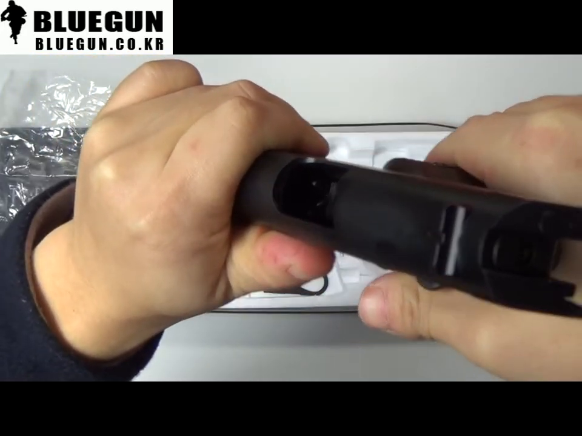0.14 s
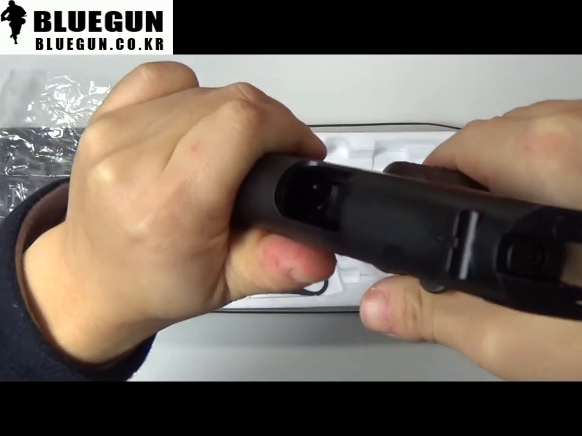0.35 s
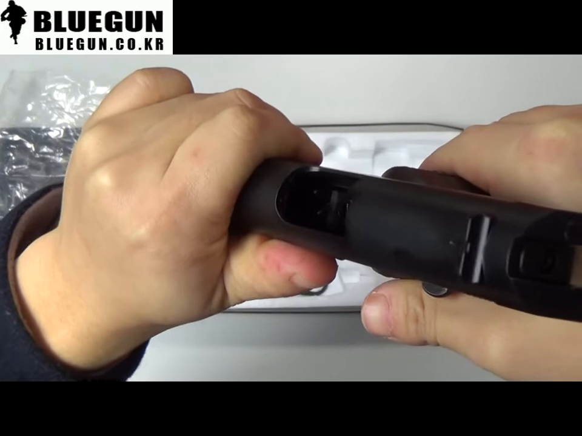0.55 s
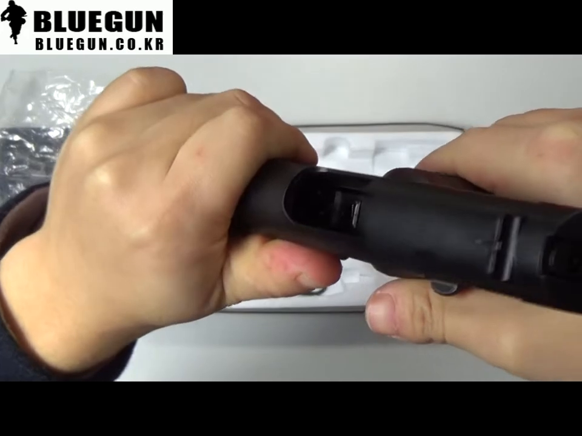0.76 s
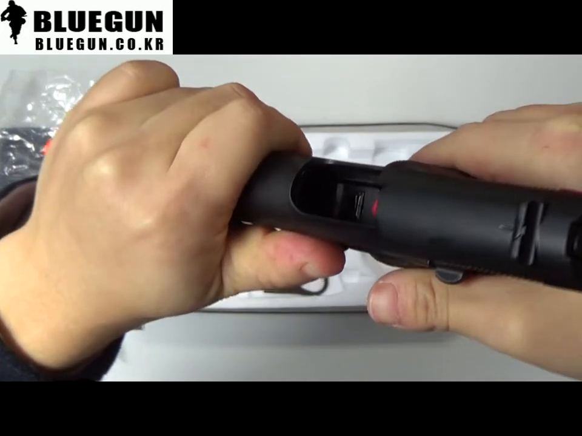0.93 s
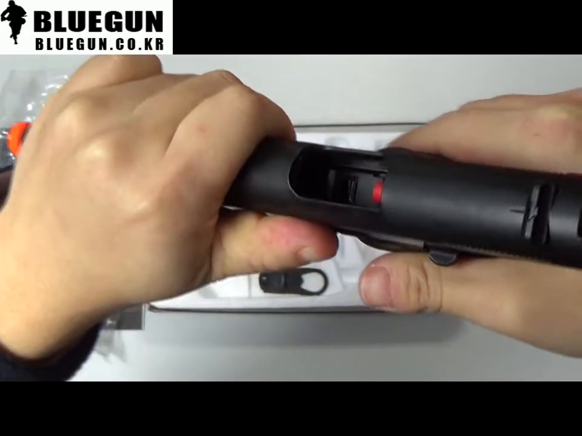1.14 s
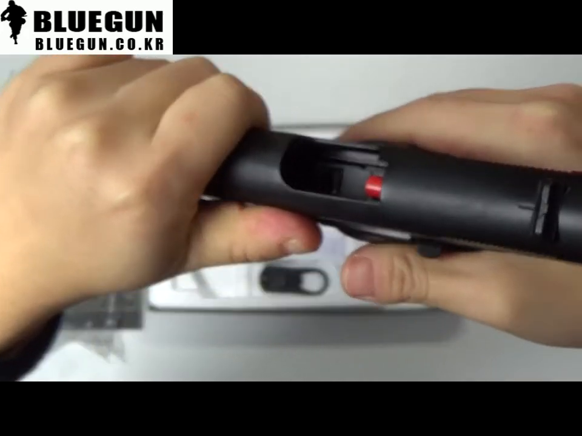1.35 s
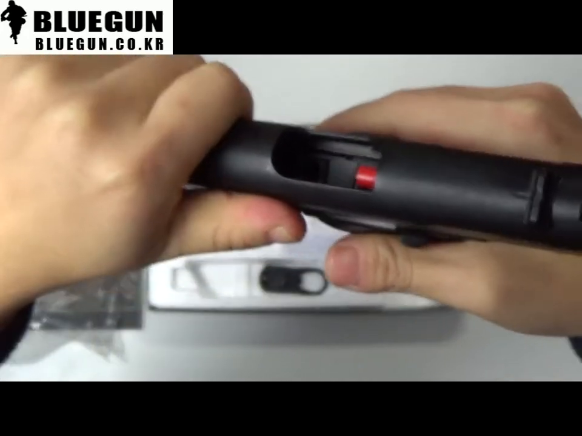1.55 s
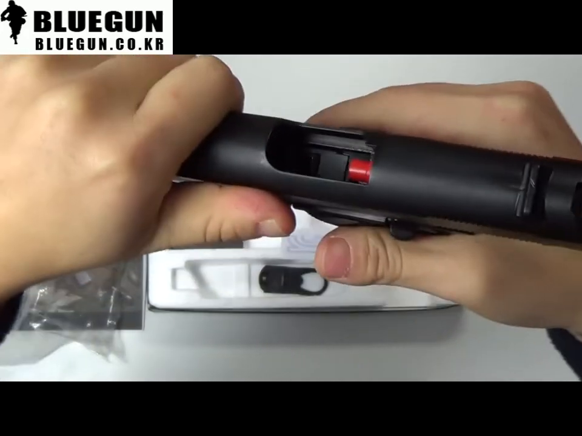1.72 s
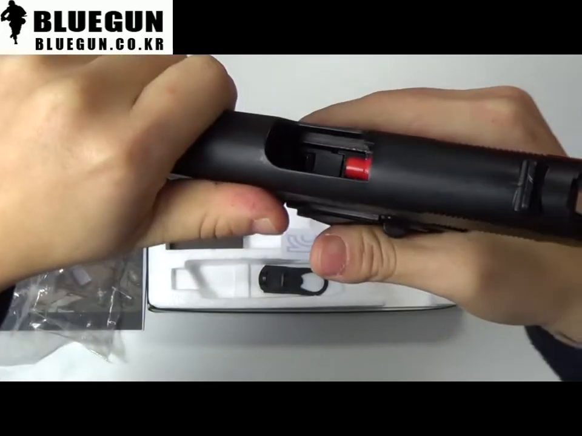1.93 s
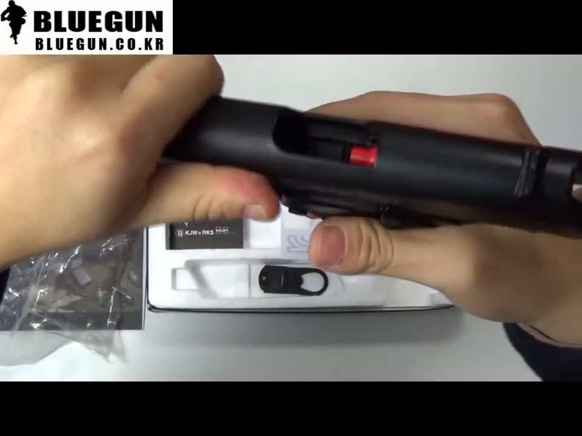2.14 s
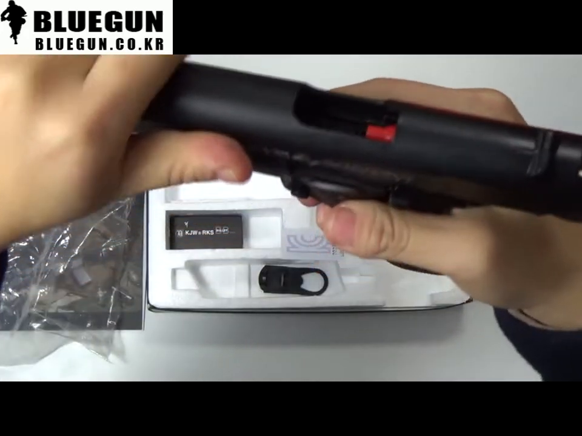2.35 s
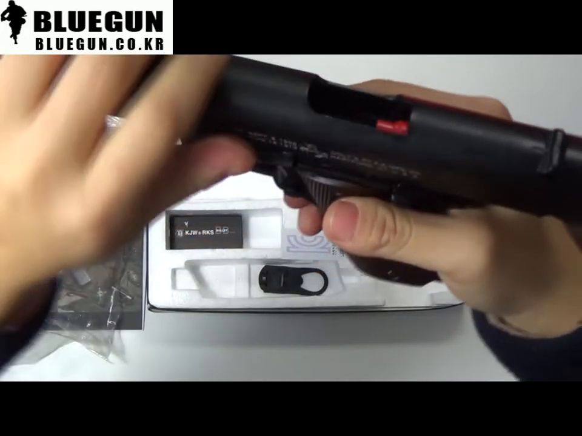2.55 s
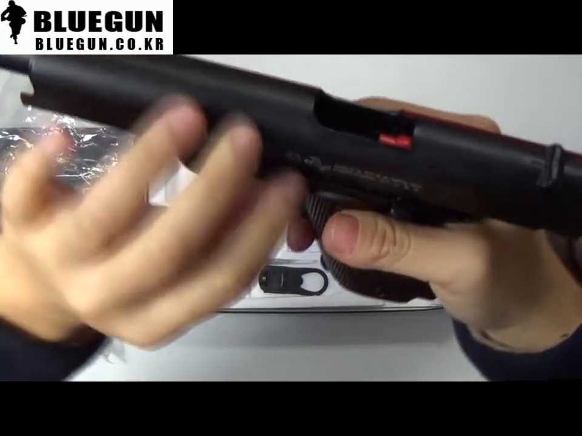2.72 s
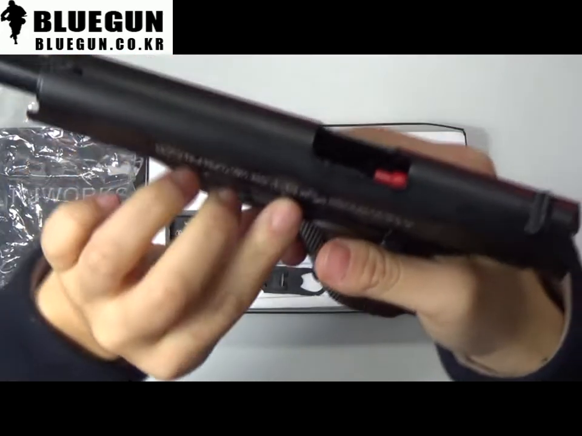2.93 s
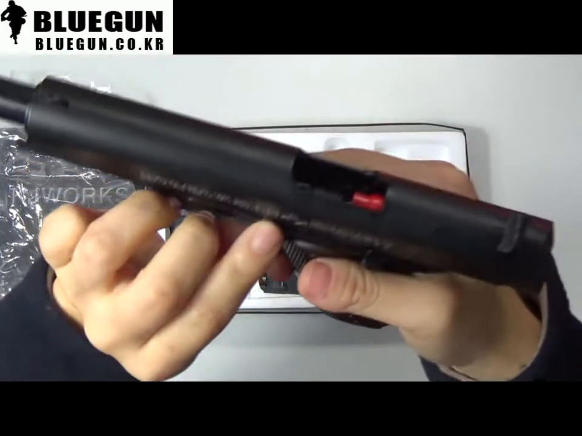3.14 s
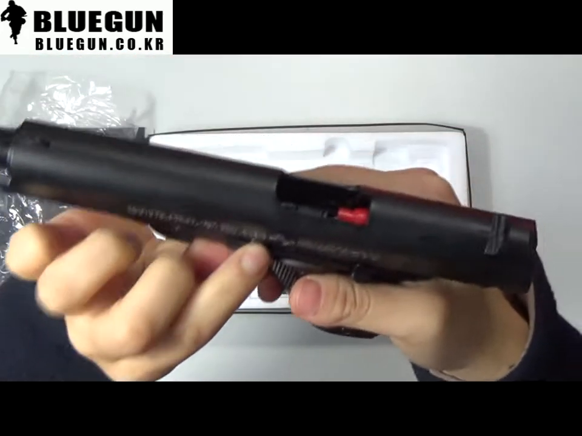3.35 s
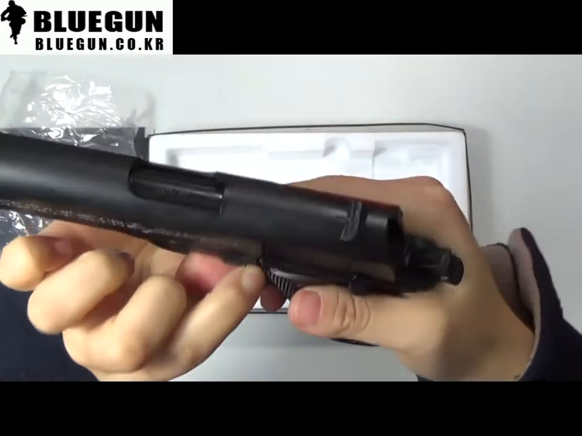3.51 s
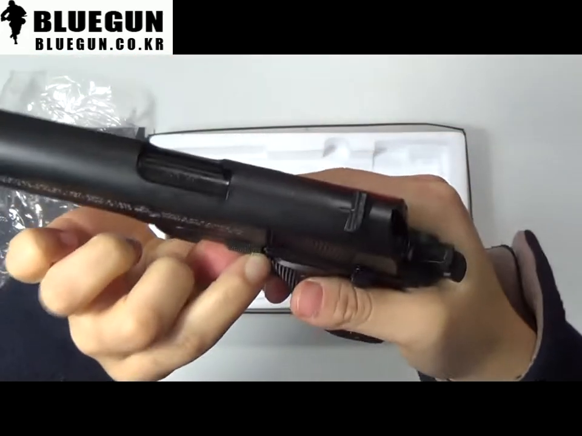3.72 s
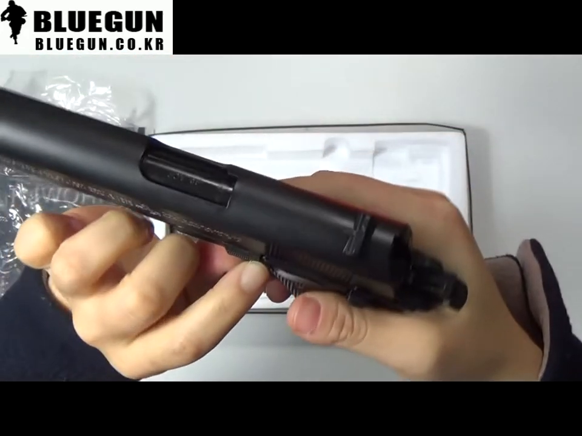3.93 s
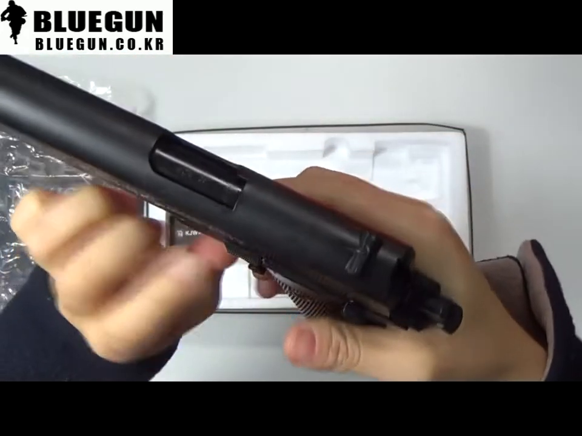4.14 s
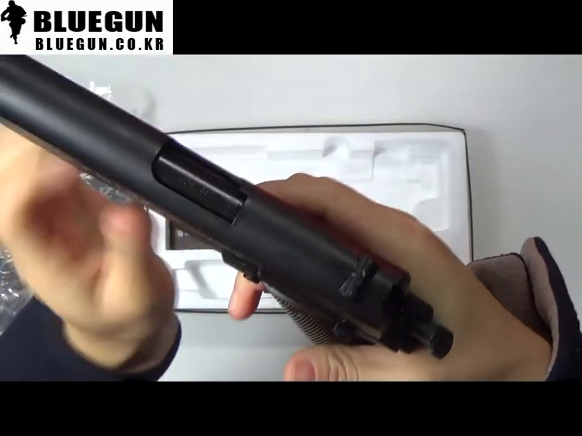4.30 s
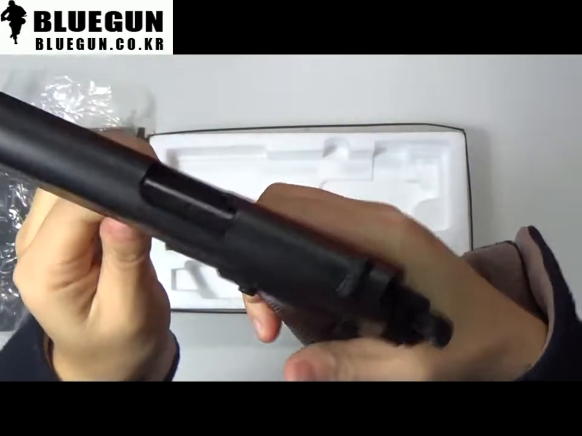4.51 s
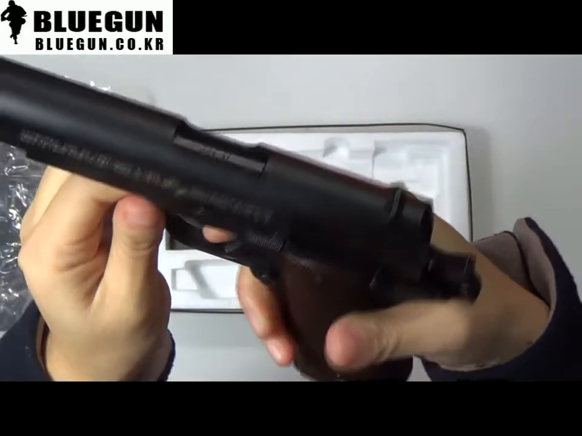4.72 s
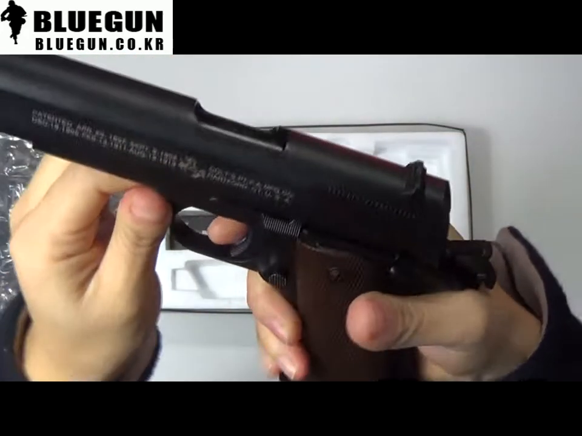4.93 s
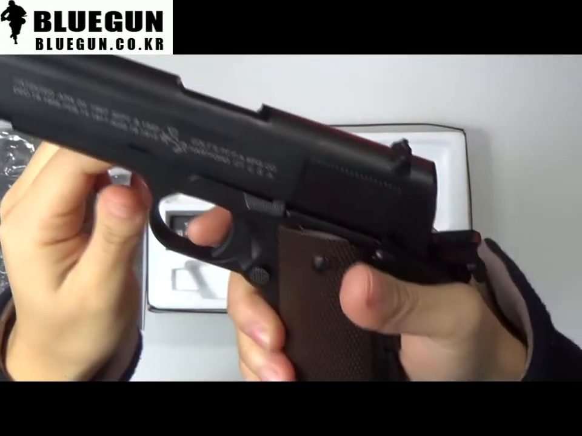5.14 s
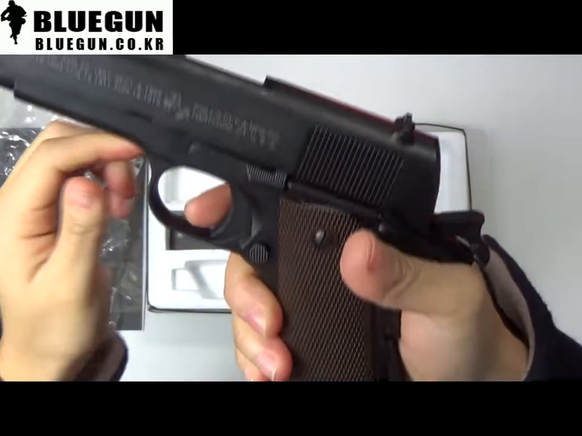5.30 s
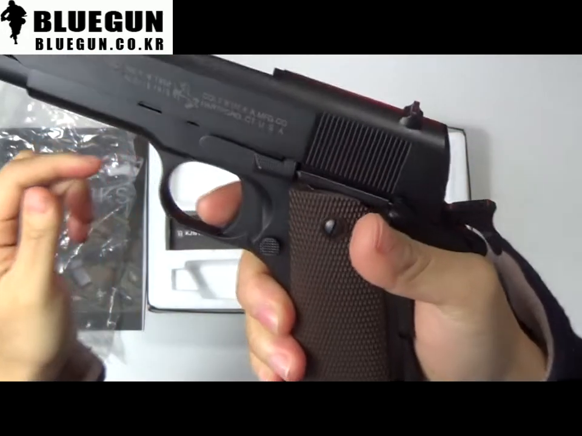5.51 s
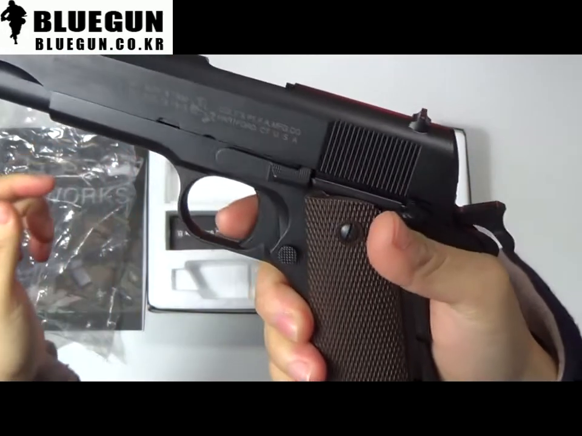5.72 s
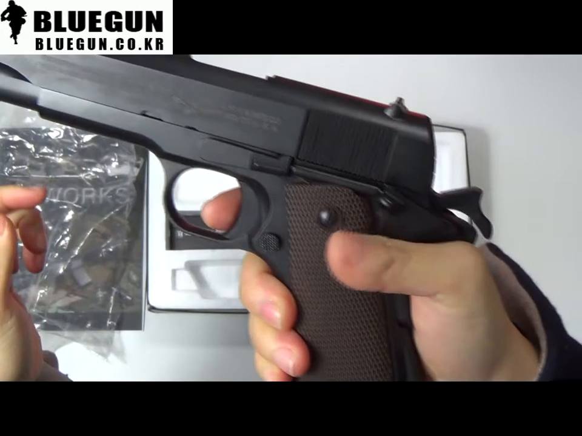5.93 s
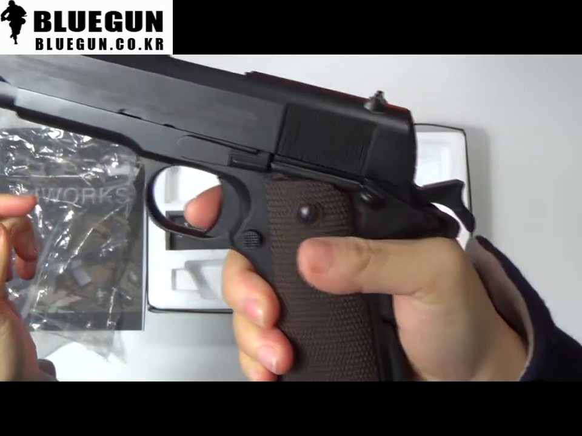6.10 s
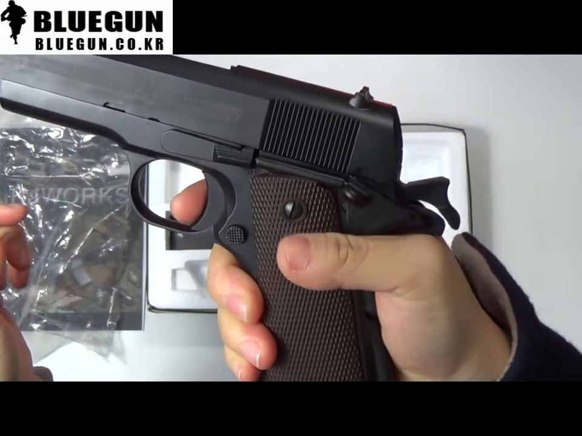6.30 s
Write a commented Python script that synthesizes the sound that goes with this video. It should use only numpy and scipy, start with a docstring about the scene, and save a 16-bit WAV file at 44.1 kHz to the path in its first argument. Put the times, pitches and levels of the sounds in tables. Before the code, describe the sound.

A small quiet room with soft air and faint low mains hum; a pistol is handled very close. At 0 s a finger rub and low palm bump, then light brushes and a dull fingertip tap; tiny ticks near 0.9 s. From 1.3 to 1.5 s a dull drag as the slide is drawn, then small ticks and a crisp, tight metal catch at 2.29 s. Around 2.65-2.9 s the hand lets go with a hissy rub, a hollow rail scrape and soft thump. At 3.42 s the stop slips and the slide slams home in a bright rattling burst, ringing until about 3.8 s, with a sharp tick at 3.63. Faint ticks near 4.4, soft bumps and taps from 4.65, then a double clack with springy buzz at 5.03-5.1 s. A fuller regrip rub at 5.3, a faint ping at 5.57, and quiet finger shifts and ticks until the end.

```python
"""An airsoft pistol is worked by hand, close up in a small quiet room with a faint mains hum.
Fingers shift, a palm bumps, fingertips tap and small parts tick; the slide is drawn back and catches open.
The hand lets go with a scrape of the rail, then the stop slips and the slide runs home in a rattle.
The action is pressed, trips and clacks with a buzz; a new grip, a spring's ping and finger shifts follow.
Force bursts excite modal bodies, thin ring lines and noise tails; shaped noise makes the rubs and air."""
import sys
import numpy as np
from scipy import signal
from scipy.fft import rfft, irfft, next_fast_len
from scipy.io import wavfile
from scipy.ndimage import map_coordinates

SR = 44100
rng = np.random.default_rng(int(sys.argv[2]) if len(sys.argv) > 2 else 0)


def int16_out(signal):
    """Quantize to a 16-bit WAV file."""
    q = np.round(np.clip(np.atleast_2d(signal).T, -1, 1) * 32767)
    wavfile.write(sys.argv[1], SR, q.astype(np.int16))


N = 280476

TOP_HZ = 10400  # upper band limit
# Room air spectrum. Each row: frequency in Hz, relative density in dB per Hz.
AIR_TONE = [(12, -35), (20, -10), (80, -12), (122, 1.5), (146, -7.5), (240, -4.5), (329, -9.5), (356, -6),
            (395, -12), (474, -13.5), (889, -16), (1040, -17.5), (1320, -19), (2740, -23.5), (10400, -26.5),
            (13500, -54), (22000, -120)]
AIR_RMS_DB = -57.5
# Mains hum lines. Each row: frequency in Hz, rms level in dB.
HUM_LINES = [(120, -66.5), (240, -73), (360, -65), (480, -70)]
# Width of diffuse sound. Each row: frequency in Hz, side relative to mid in dB.
SIDE_WIDTH = [(100, -30), (340, -13.5), (600, -9.5), (1100, -7), (3000, -6), (10000, -11.5)]

# Finger shifts on the gun. Each row: start in seconds, hold in seconds, rub level in dB, hiss level in dB.
FINGER_SHIFTS = [(-0.03, 0.011, -44.5, -52), (0.22, 0.027, -49, -53), (0.39, 0.13, -56.5, -59),
                 (0.607, 0.036, -55, -58), (0.717, 0.17, -60.5, -66.5), (0.969, 0.042, -58.5, -58),
                 (1.552, 0.017, -57, -61.5), (4.75, 0.0041, -60, -65), (5.595, 0.022, -48.5, -49.5),
                 (6.027, 0.16, -58, -69), (6.199, 0.0069, -57, -69)]
FINGER_ATTACK_S = 0.026
# Stroke spectra, one per hand movement. Each row: frequency in Hz, relative density in dB per Hz.
FINGER_TONE = [(120, -18), (200, -3), (738, -4.5), (829, -7.5), (915, -1.5), (994, -9.5), (1270, -5.5),
               (1450, -7.5), (4190, -18), (10400, -23), (13500, -53), (22000, -120)]
PULL_TONE = [(18, -39), (30, -14), (69, -10), (112, -11.5), (278, -4.5), (347, -9), (454, 0.5), (705, -10),
             (796, -1), (922, -13.5), (1070, -10.5), (3060, -14), (4400, -21.5), (6000, -29), (10400, -38),
             (13500, -70), (22000, -120)]
LET_GO_TONE = [(100, -26), (300, -11), (550, -9.5), (900, -8.5), (1180, -4), (1320, -0.5), (1560, -4),
               (1850, -8.5), (2600, -13), (3500, -14.5), (4600, -19.5), (7000, -21), (10400, -21)]
PRESS_TONE = [(180, -32), (300, -3), (461, -6), (527, -10), (983, 2.5), (1730, -19), (2290, -10),
              (2900, -19), (8450, -20), (10400, -21), (13500, -50), (22000, -120)]
REGRIP_TONE = [(59, -59), (100, -22), (226, -7), (390, -12), (473, -0.5), (532, -12.5), (726, -5),
               (784, -12), (953, -1.5), (1050, -7), (2620, -15), (3710, -12.5), (10400, -21), (13500, -56),
               (22000, -120)]
HISS_POWER = 1.285  # hiss needs more pressure than rub: it follows pressure to this power

# Palm bumps on the hollow grip. Each row: start in seconds, level in dB.
PALM_THUMPS = [(0.026, -46.5), (2.877, -45), (4.68, -43.5), (5.109, -42)]
THUMP_HZ, THUMP_ATTACK_S, THUMP_T60_S = 140, 0.0093, .25

# Contact forces, in order: fingertips land on the grip, slide catches open, stop lever slips out of its
# notch, slide runs home over its stops, catch trips, action clacks.
# Each row: start in seconds, relative level in dB, time to fall 60 dB in seconds.
TAP_CONTACTS = [(0.236, -38, 0.054), (1.336, -36, .05), (4.647, -44, .03), (4.777, -43, 0.037),
                (4.931, -39, 0.039), (5.008, -28.5, 0.11)]
CATCH_CONTACTS = [(2.283, -38, .02), (2.2853, -11, 0.013), (2.2882, -10, 0.018), (2.2903, -10.5, 0.013),
                  (2.2985, -35, 0.023), (2.307, -42, 0.023)]
RELEASE_CONTACTS = [(3.4195, -28, 0.034), (3.4243, -11.5, 0.018), (3.4278, -10.5, 0.0071)]
RUN_CONTACTS = [(3.428, -17, 0.0095), (3.4315, -12.5, 0.013), (3.438, -11, 0.024), (3.4435, -13, 0.02),
                (3.449, -19, .014), (3.4563, -8.5, 0.0088), (3.4692, -15.5, 0.016), (3.4793, -9, 0.024)]
TRIP_CONTACTS = [(5.023, -35, 0.061), (5.029, -12.5, 0.017)]
ACTION_CONTACTS = [(5.040, -8.5, 0.017), (5.049, -13, 0.031), (5.056, -13, 0.028), (5.095, -15, 0.0062)]
# Small loose parts touch. Each row: start in seconds, relative pin level in dB,
# lever knock relative to pin in dB, time to fall 60 dB in seconds.
LOOSE_TICKS = [(0.9028, -47, 3, 0.021), (0.915, -41.5, -5, 0.027), (0.929, -45, -6, 0.016),
               (0.984, -36.5, -8, 0.028), (1.5968, -42, -11, 0.013), (2.101, -39, -12, 0.01),
               (2.2264, -40, -4, 0.013), (2.653, -51, 9, .05), (3.3011, -30, 6, 0.027),
               (3.6334, -10.5, -10, 0.013), (3.719, -40.5, -0.5, 0.017), (4.4, -38.5, -2, 0.036),
               (4.439, -47, -1, 0.017), (4.648, -51.5, 7.5, 0.012), (6.119, -51, 10.5, 0.012),
               (6.2286, -44, 2.5, 0.019)]

# Body resonances: grip, pin, lever, frame, slide, slide scraped at its rail, small spring.
# Each row: centre in Hz, width in Hz, relative level in dB.
GRIP_MODES = [(520, 310, 0), (950, 260, 3), (2310, 1000, -14)]
PIN_MODES = [(6100, 400, -15), (8000, 450, -4), (8870, 630, 2.5), (9820, 410, -0.5)]
LEVER_MODES = [(1530, 450, -11.5), (2460, 450, 2.5), (3460, 690, -4), (4870, 320, -1)]
FRAME_MODES = [(944, 100, -6), (1594, 316, 2.5), (2580, 420, -9.5), (3460, 770, -8), (5630, 1800, -15),
               (7300, 910, -9), (7960, 500, -0.5), (9360, 810, -2.5), (9850, 440, -1.5)]
SLIDE_MODES = [(910, 87, -15), (1620, 86, -10), (2000, 300, -25), (2400, 320, 2), (3110, 1050, 0),
               (4270, 890, -2.5), (5070, 530, -3.5), (6630, 1200, 0.5), (7700, 700, 3), (8850, 740, 1.5),
               (9500, 300, -20)]
RAIL_MODES = [(1300, 150, -6), (1465, 120, -0.5), (2300, 700, -15)]
SPRING_MODES = [(4800, 70, 0), (6340, 120, -9)]
# Narrow ringing of the metal. Each row: frequency in Hz, relative level in dB.
PIN_RING = [(1520, -8), (6200, 0)]
SLIDE_RING = [(2282, 2), (2357, 2.5), (4020, -24), (4297, -22), (7160, 5), (7631, 1), (8572, -3),
              (9420, -2), (9524, -3)]
FRAME_RING = [(1440, 1), (1508, 0), (1570, 2), (1647, -10), (7790, -2), (7845, 1), (8020, -4), (9915, -5)]
# Ring-on of gun and room together. Each row: frequency in Hz, time to fall 60 dB in seconds.
FRAME_DECAY = [(500, 0.38), (1500, 0.3), (4000, 0.32), (10000, 0.22)]
SLIDE_DECAY = [(500, 0.45), (1500, 0.36), (4000, 0.35), (10000, 0.21)]
RAIL_DECAY = [(1400, 0.54), (4000, 0.24)]


def amp(db):
    """Decibels to gain."""
    return 10 ** (np.asarray(db) / 20)


def unit(x):
    """Scaled to rms 1."""
    return x / np.sqrt(np.mean(x ** 2) + 1e-20)


def along(points, hz):
    """(Hz, value) points read on a log frequency axis."""
    f, v = np.transpose(points)
    return np.interp(np.log(hz + 1), np.log(f), v)


def clock_s():
    """Time of every sample."""
    return np.arange(N) / SR


def pan(db):
    """Left and right gains; db is left over right."""
    return amp([[db / 2], [-db / 2]])


def wobble(rate_hz):
    """Smooth random curve with rate_hz knots a second."""
    knots = rng.standard_normal(int(N * rate_hz / SR) + 4)
    return map_coordinates(knots, [clock_s() * rate_hz])


def filtered(x, response):
    """x times a response of frequency."""
    m = next_fast_len(N + SR // 2)
    return irfft(rfft(x, m) * response(np.fft.rfftfreq(m, 1 / SR)), m)[..., :N]


def resonate(x, modes, tilt_db_per_oct=0, low_hz=620):
    """x through a body's resonances, tilted; so small a body radiates little bass."""
    def body(f):
        peaks = sum(amp(db) * 1j * f * w / (c * c - f * f + 1j * f * w) for c, w, db in modes)
        radiation = f * f / (f * f - low_hz ** 2 - 1j * f * low_hz)
        return peaks * radiation * amp(tilt_db_per_oct * np.log2(f + 1))

    def unit_body(f):
        gain = body(f)
        return gain / np.sqrt(np.mean(abs(gain) ** 2))
    return filtered(x, unit_body)


def spread(pair):
    """Two unrelated signals become a diffuse left and right, near mono in the bass."""
    side = filtered(pair[1], lambda f: amp(along(SIDE_WIDTH, f)))
    return np.array([pair[0] + side, pair[0] - side])


def ring_on(x, decay, build_s=0.0066):
    """Dense stereo noise tail that builds briefly and dies at its own speed in each band."""
    hz, t, z = signal.stft(rng.standard_normal((2, SR * 3 // 4)), SR, nperseg=256)
    fade = 10 ** (-3 * t / along(decay, hz)[:, None]) * (1 - np.exp(-t / build_s))
    tail = signal.istft(z * fade, SR, nperseg=256)[1]
    tail = tail / np.linalg.norm(tail[0])
    return spread(signal.fftconvolve(x[None], tail, axes=1)[:, :N])


def metal(force, lines, t60_s):
    """Thin lines of struck metal; high ones die sooner, and each reaches the two sides at another phase."""
    t = np.arange(SR // 2) / SR
    ring = 0
    for hz, db in lines:
        phase = rng.uniform(0, 2 * np.pi) + 0.38 * rng.standard_normal((2, 1))
        life_s = t60_s * (1500 / hz) ** .25  # t60_s holds at 1500 Hz
        ring = ring + amp(db - 60 * t / life_s) * np.sin(2 * np.pi * hz * t + phase)
    ring = ring / np.linalg.norm(ring[0])
    return signal.fftconvolve(force[None], ring, axes=1)[:, :N]


def contacts(rows):
    """Each hard contact is a decaying crack of random-sign force."""
    force, t = np.zeros(N + SR), np.arange(SR // 10) / SR
    for start_s, db, length_s in rows:
        crack = amp(db - 60 * t / length_s) * rng.choice([-1, 1], len(t))
        force[round(start_s * SR):][:len(t)] += crack
    return force[:N] / 2


def chatter(peak_s, db, rise_s, fall_s, rate_hz):
    """Rattling parts: tiny random impacts that swell to peak_s and fade."""
    t = clock_s() - peak_s
    impacts = (rng.random(N) < rate_hz / SR) * rng.standard_normal(N)
    swell = np.exp(-(t / np.where(t < 0, rise_s, fall_s)) ** 2)
    return amp(db) * unit(impacts) * swell


def clack(force, modes, decay, db, tilt_db, tail_db, dulling_db, pan_db):
    """Direct blow plus the gun ringing on in the room; dulling_db an octave darkens the tail."""
    direct = resonate(force, modes, tilt_db)
    tail = amp(tail_db) * ring_on(resonate(force, modes, tilt_db - dulling_db), decay)
    return amp(db) * (direct + tail) * pan(pan_db)


def background():
    """Low room air with a mains hum whose phase wanders slightly."""
    noise = spread(rng.standard_normal((2, N)))
    air = unit(filtered(noise, lambda f: amp(along(AIR_TONE, f)) * (f < TOP_HZ)))
    hum = 0
    for hz, db in HUM_LINES:
        phase = 2 * np.pi * hz * clock_s() + 0.32 * wobble(4.05)
        hum = hum + amp(db) * np.sqrt(2) * np.sin(phase)
    return amp(AIR_RMS_DB) * air + hum


def stroke(tone, start_s, attack_s, hold_s, fade_db_per_s, rub_db, hiss_db, rough_db, pan_db, hiss_lead_s=0):
    """Dragging skin: pressure builds, holds and fades, driving a dull rub and fine hiss with tiny slips."""
    def pressure(t):
        fade_db = -fade_db_per_s * np.maximum(t - attack_s - hold_s, 0)
        return np.clip(t / attack_s, 0, 1) * amp(fade_db)

    def dull(f):
        return 1 / (1 + (f / 2500) ** 8)  # rub below, hiss above 2500 Hz

    t = clock_s() - start_s
    noise = spread(rng.standard_normal((2, N))) * amp(rough_db * wobble(350))
    rub = unit(filtered(noise, lambda f: amp(along(tone, f)) * dull(f)))
    hiss = unit(filtered(noise, lambda f: amp(along(tone, f)) * (1 - dull(f)) * (f < TOP_HZ)))
    rub = rub * pressure(t)
    hiss = hiss * pressure(t + hiss_lead_s) ** HISS_POWER
    return (rub * amp(rub_db) + hiss * amp(hiss_db)) * pan(pan_db)


def hands():
    """Skin friction: finger shifts, drawing the slide, letting go, pressing on the action, a new grip."""
    shifts = sum(stroke(FINGER_TONE, start_s, FINGER_ATTACK_S, hold_s, fade_db_per_s=109,
                        rub_db=rub_db, hiss_db=hiss_db, rough_db=1.0, pan_db=-1.1)
                 for start_s, hold_s, rub_db, hiss_db in FINGER_SHIFTS)
    pull = stroke(PULL_TONE, start_s=1.326, attack_s=0.083, hold_s=0.049, fade_db_per_s=89,
                  rub_db=-37.5, hiss_db=-47.5, rough_db=0.9, pan_db=-1.0, hiss_lead_s=-0.0035)
    let_go = stroke(LET_GO_TONE, start_s=2.652, attack_s=.1, hold_s=.11, fade_db_per_s=105,
                    rub_db=-38, hiss_db=-37.5, rough_db=1.0, pan_db=-1.5, hiss_lead_s=0.021)
    press = stroke(PRESS_TONE, start_s=4.927, attack_s=0.0052, hold_s=.11, fade_db_per_s=396,
                   rub_db=-51, hiss_db=-58.5, rough_db=1.0, pan_db=-2.0)
    regrip = stroke(REGRIP_TONE, start_s=5.278, attack_s=0.074, hold_s=0.09, fade_db_per_s=124,
                    rub_db=-34.0, hiss_db=-41, rough_db=0.0, pan_db=-1.3, hiss_lead_s=0.011)
    return shifts + pull + let_go + press + regrip


def thumps():
    """The soft palm gives a low, short thud: a decaying sine with a soft onset."""
    def thud(t):
        envelope = (1 - np.exp(-t / THUMP_ATTACK_S)) * amp(-60 * t / THUMP_T60_S)
        return envelope * np.sin(2 * np.pi * THUMP_HZ * t)
    return sum(amp(db) * thud(np.maximum(clock_s() - start_s, 0)) for start_s, db in PALM_THUMPS)


def taps():
    """Soft fingertips excite the plastic grip into dull knocks."""
    knocks = resonate(contacts(TAP_CONTACTS), GRIP_MODES)
    return amp(-6.5) * knocks + amp(-4.5) * ring_on(knocks, FRAME_DECAY)


def ticks():
    """Nearly dry touches of loose parts: a bright pin click over a lower lever knock."""
    pin_force = contacts([(s, db, length_s) for s, db, _, length_s in LOOSE_TICKS])
    lever_force = contacts([(s, db + knock_db, length_s) for s, db, knock_db, length_s in LOOSE_TICKS])
    touch = resonate(pin_force, PIN_MODES) + amp(-1.0) * resonate(lever_force, LEVER_MODES)
    tail = amp(-15.5) * ring_on(touch, FRAME_DECAY)
    ring = amp(-18.5) * metal(pin_force, PIN_RING, t60_s=0.17)
    return touch + tail + ring


def slide_catch():
    """The drawn slide catches open, striking the frame's resonances."""
    return clack(contacts(CATCH_CONTACTS), FRAME_MODES, FRAME_DECAY,
                 db=2.5, tilt_db=4.0, tail_db=-5.0, dulling_db=3.5, pan_db=0.5)


def scrape():
    """As the hand lets go, the slide grates on its rail: random impacts excite the hollow slide."""
    grit = chatter(peak_s=2.772, db=-35.5, rise_s=0.038, fall_s=0.028, rate_hz=900)
    grating = resonate(grit, RAIL_MODES)
    tail = amp(-2.0) * ring_on(grating, RAIL_DECAY)
    return (amp(2.5) * grating + tail) * pan(-0.5)


def slide_run():
    """The stop lever slips, then the slide runs home over its stops; both forces ring the slide's metal."""
    slip = contacts(RELEASE_CONTACTS)
    release = clack(slip, LEVER_MODES, SLIDE_DECAY,
                    db=1.5, tilt_db=2.0, tail_db=-7, dulling_db=1.0, pan_db=1.0)
    rattle = chatter(peak_s=3.497, db=-26.5, rise_s=0.022, fall_s=0.039, rate_hz=3600)
    run = contacts(RUN_CONTACTS) + rattle
    home = clack(run, SLIDE_MODES, SLIDE_DECAY,
                 db=1.54, tilt_db=0.76, tail_db=-1.0, dulling_db=-0.5, pan_db=-0.5)
    ring = amp(-10) * metal(slip + run, SLIDE_RING, t60_s=0.34)
    return release + home + ring


def action_clack():
    """The catch trips, the action strikes the frame, and the blow sets a spring buzzing against it."""
    trip = clack(contacts(TRIP_CONTACTS), SLIDE_MODES, FRAME_DECAY,
                 db=1.4, tilt_db=2.8, tail_db=-5, dulling_db=-1.5, pan_db=1.3)
    strike = contacts(ACTION_CONTACTS)
    blow = clack(strike, FRAME_MODES, FRAME_DECAY,
                 db=1.1, tilt_db=2.5, tail_db=1.5, dulling_db=1.0, pan_db=1.5)
    spring = chatter(peak_s=5.075, db=-26.0, rise_s=0.017, fall_s=0.021, rate_hz=7900)
    buzz = clack(spring, FRAME_MODES, FRAME_DECAY,
                 db=-1, tilt_db=-1.36, tail_db=2.5, dulling_db=0.0, pan_db=-2.5)
    ring = amp(-5) * metal(amp(-4) * strike + spring, FRAME_RING, t60_s=0.38)
    return trip + blow + buzz + ring


def ping(start_s, db, t60_s):
    """A flicked small spring sings briefly: a decaying force through narrow resonances."""
    return resonate(contacts([(start_s, db, t60_s)]), SPRING_MODES)


def scene():
    """Room, hands and gun summed."""
    handling = background() + hands() + thumps() + taps() + ticks()
    mechanism = slide_catch() + scrape() + slide_run() + action_clack()
    return handling + mechanism + ping(start_s=5.569, db=-45, t60_s=0.28)


def record(dry):
    """Steep low-pass at the upper band limit."""
    return filtered(dry, lambda f: 1 / np.sqrt(1 + (f / TOP_HZ) ** 160))


dry = scene()
out = record(dry)
int16_out(out)
```